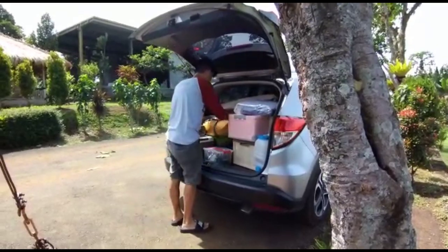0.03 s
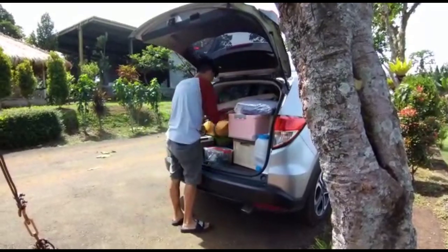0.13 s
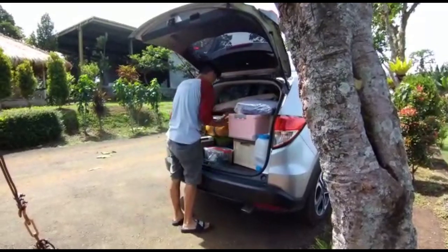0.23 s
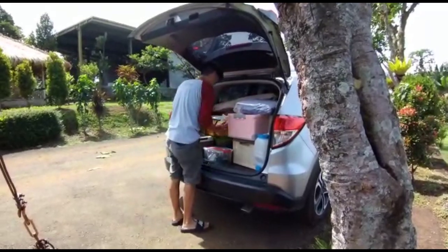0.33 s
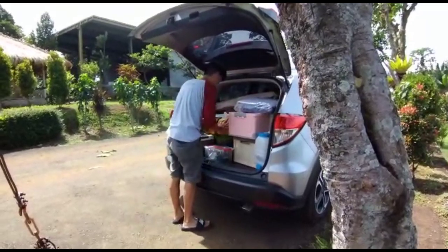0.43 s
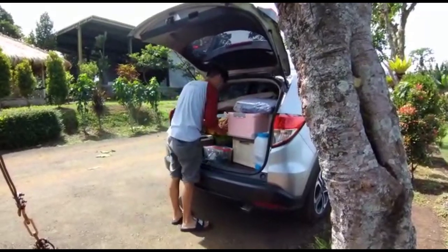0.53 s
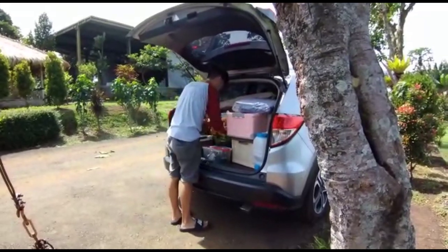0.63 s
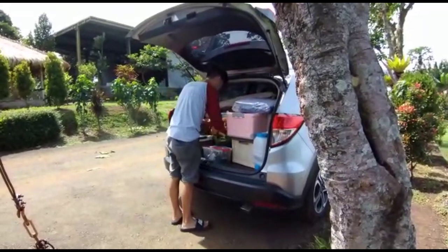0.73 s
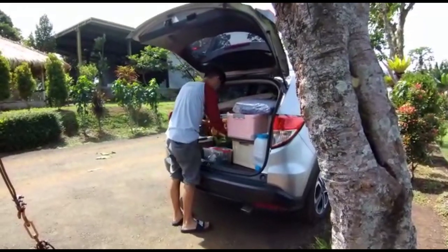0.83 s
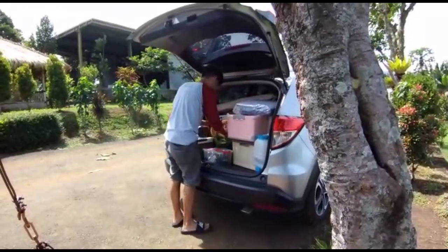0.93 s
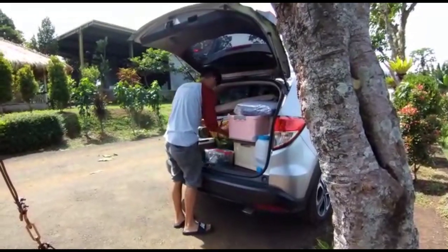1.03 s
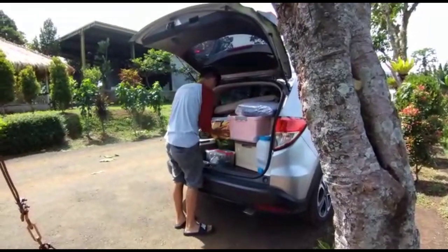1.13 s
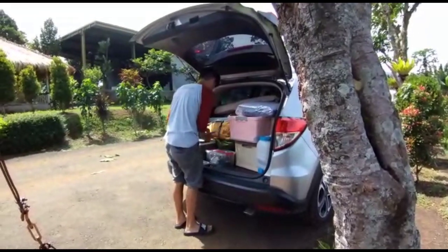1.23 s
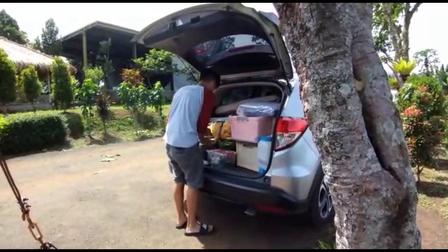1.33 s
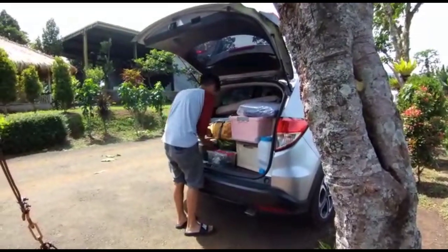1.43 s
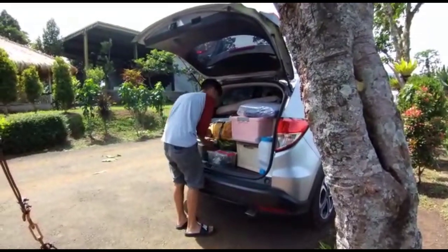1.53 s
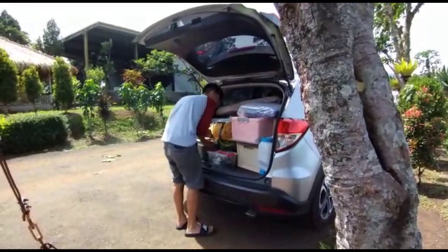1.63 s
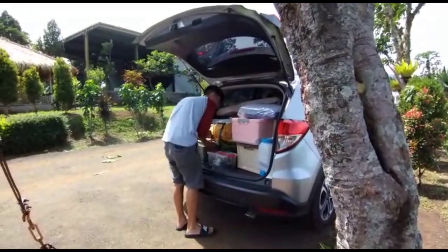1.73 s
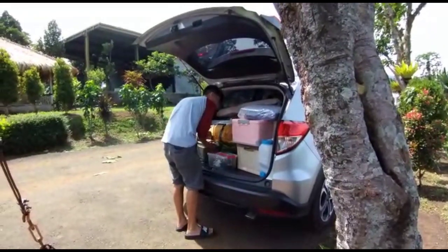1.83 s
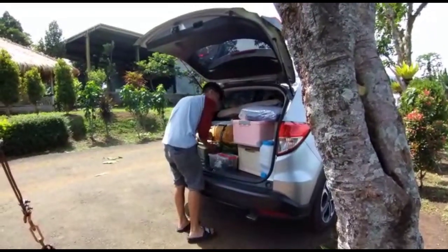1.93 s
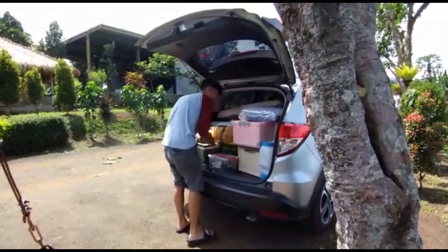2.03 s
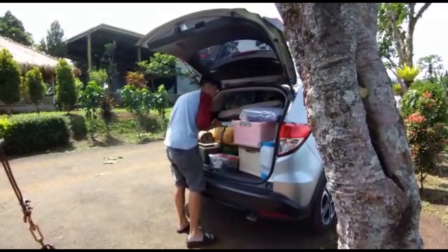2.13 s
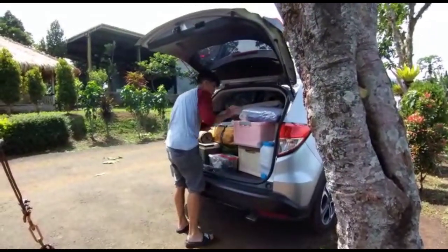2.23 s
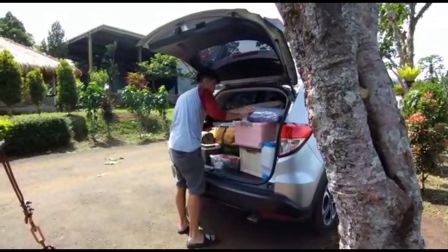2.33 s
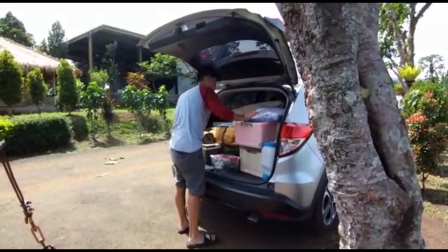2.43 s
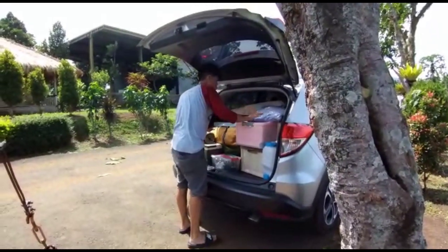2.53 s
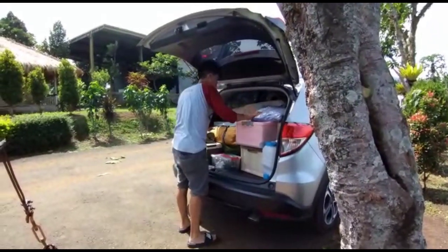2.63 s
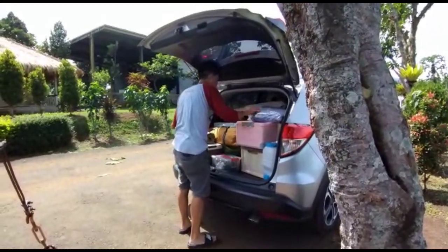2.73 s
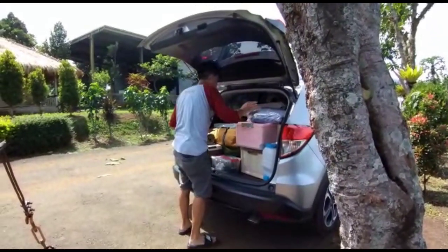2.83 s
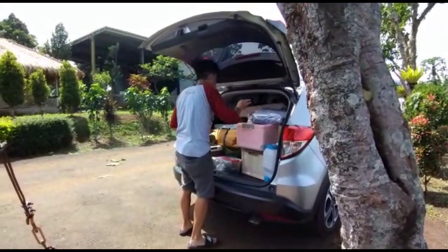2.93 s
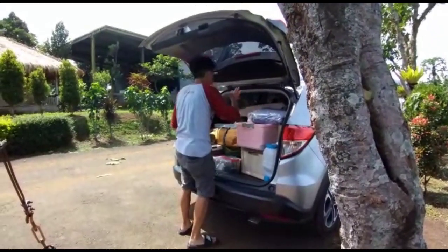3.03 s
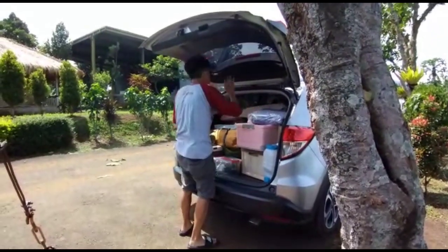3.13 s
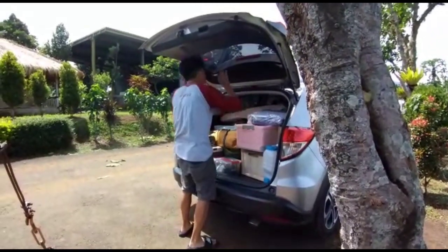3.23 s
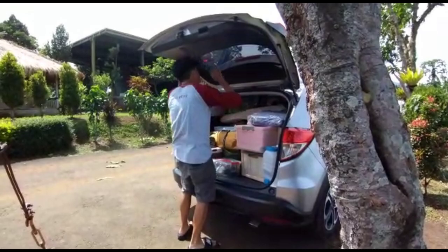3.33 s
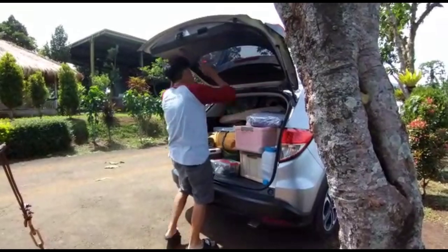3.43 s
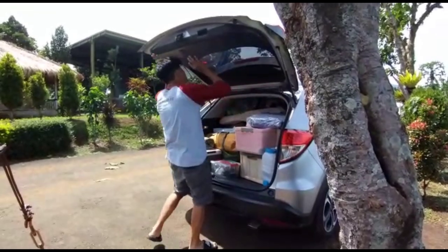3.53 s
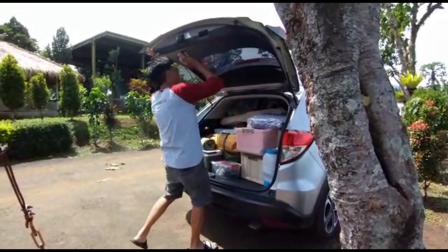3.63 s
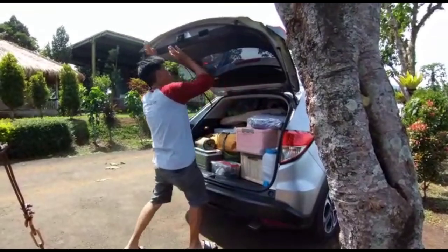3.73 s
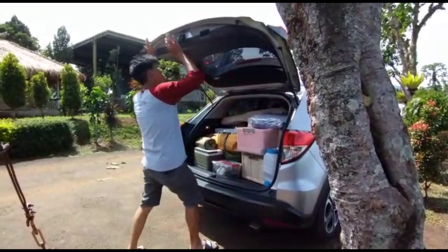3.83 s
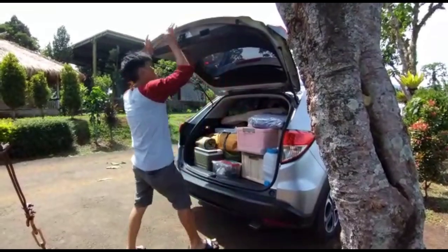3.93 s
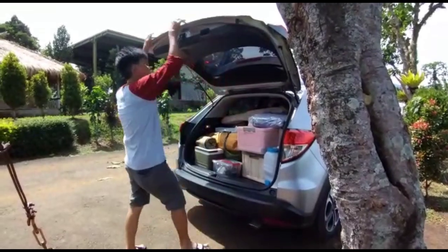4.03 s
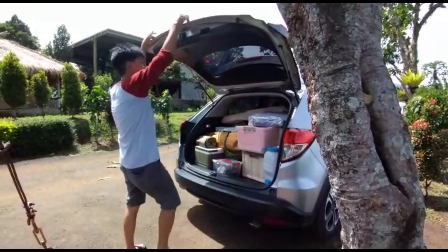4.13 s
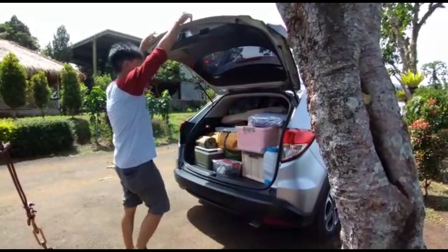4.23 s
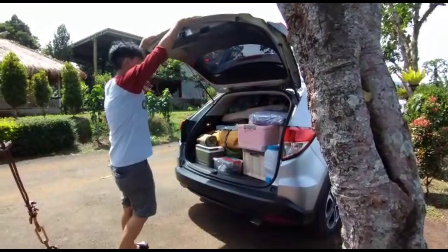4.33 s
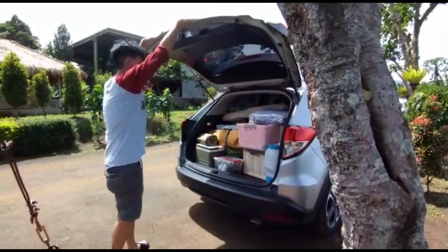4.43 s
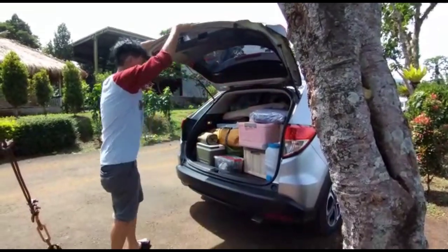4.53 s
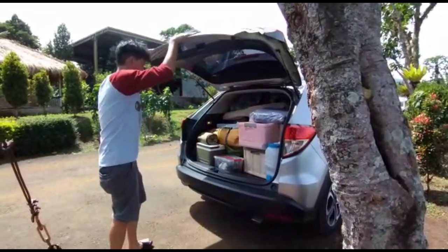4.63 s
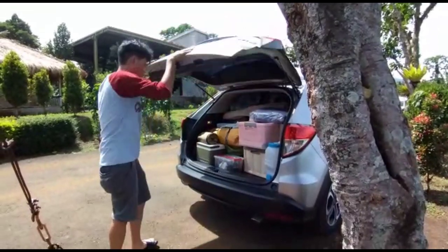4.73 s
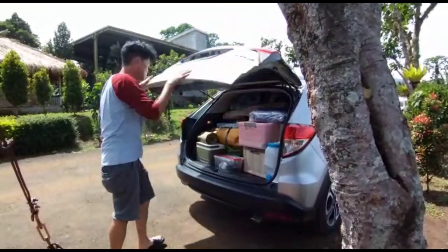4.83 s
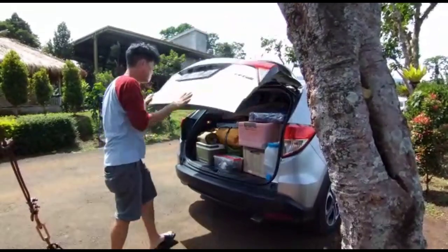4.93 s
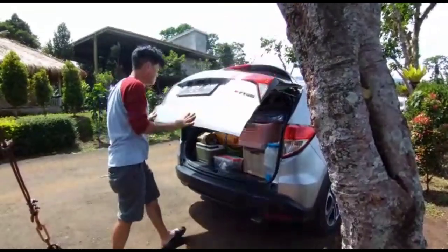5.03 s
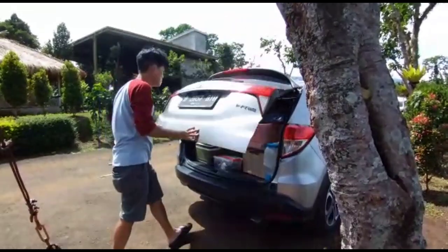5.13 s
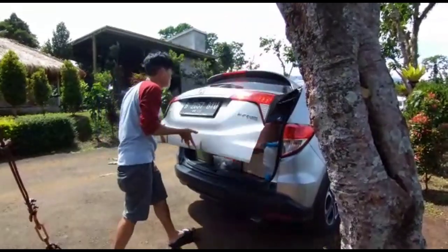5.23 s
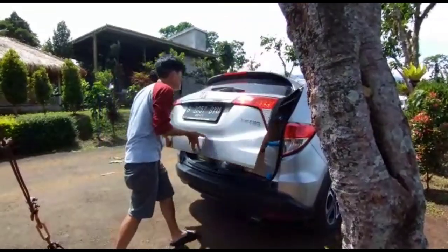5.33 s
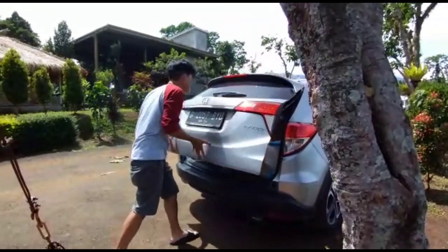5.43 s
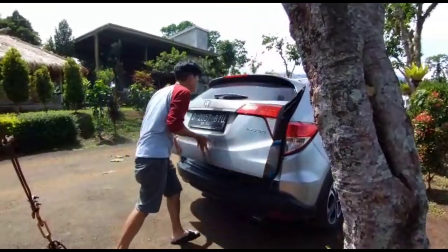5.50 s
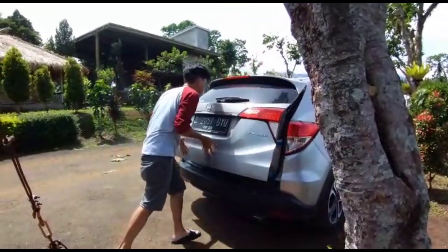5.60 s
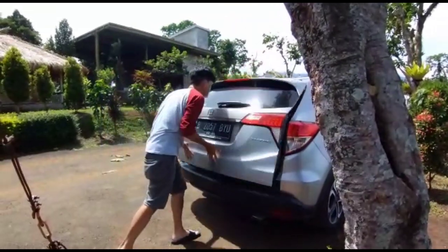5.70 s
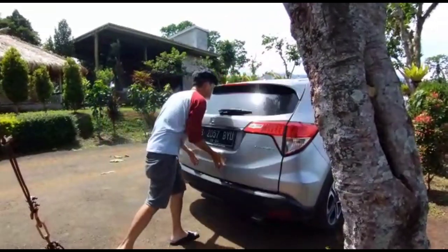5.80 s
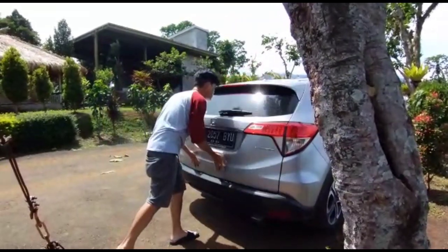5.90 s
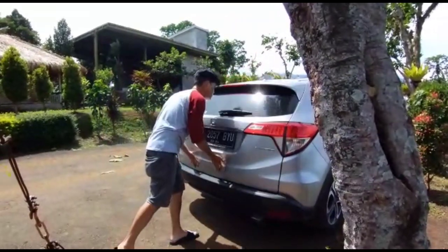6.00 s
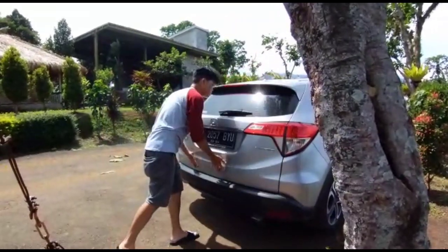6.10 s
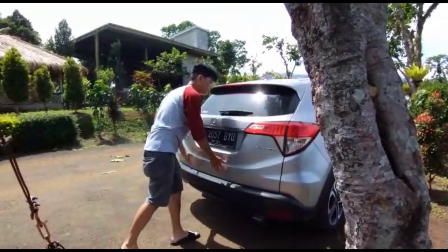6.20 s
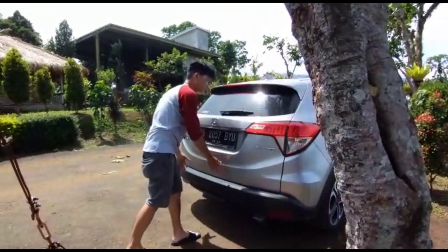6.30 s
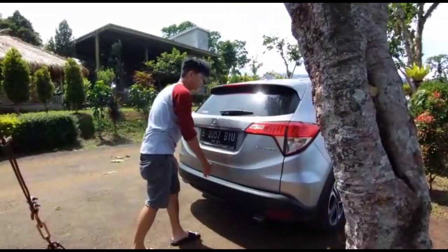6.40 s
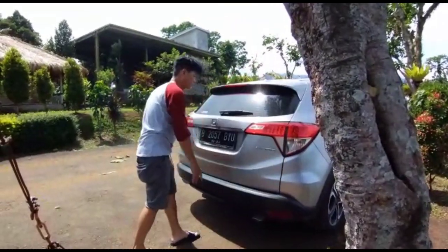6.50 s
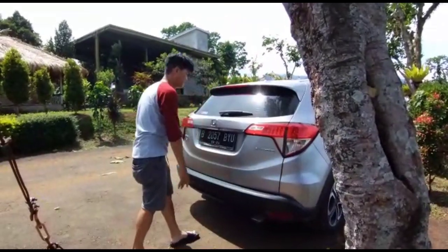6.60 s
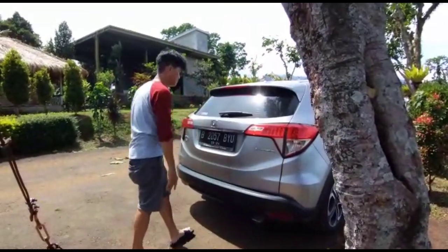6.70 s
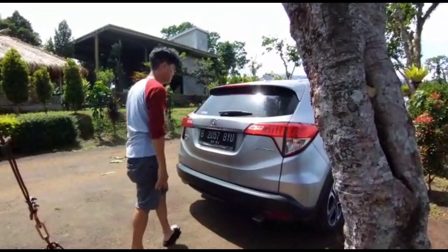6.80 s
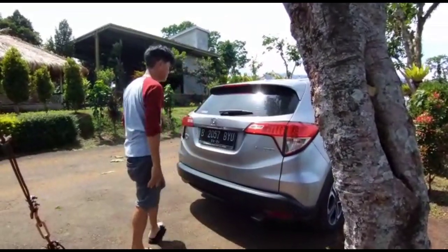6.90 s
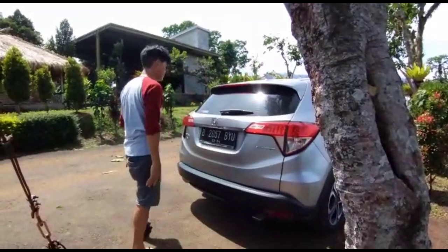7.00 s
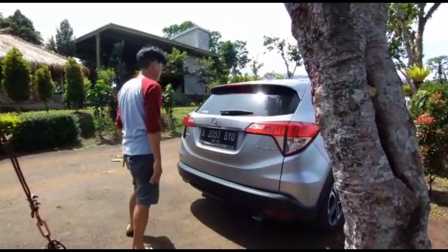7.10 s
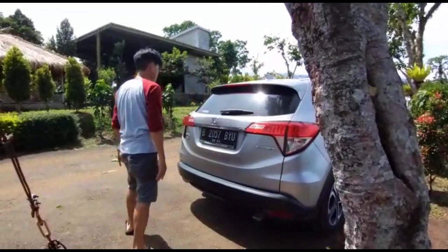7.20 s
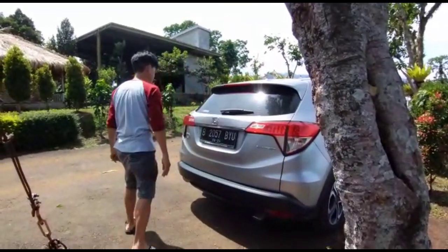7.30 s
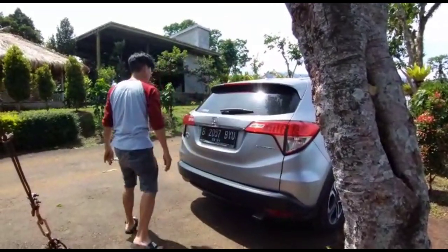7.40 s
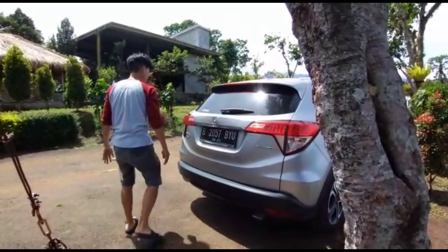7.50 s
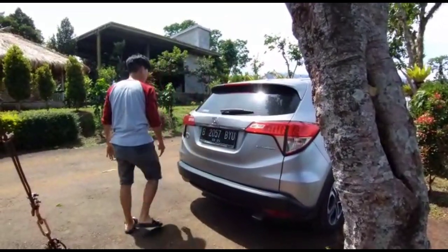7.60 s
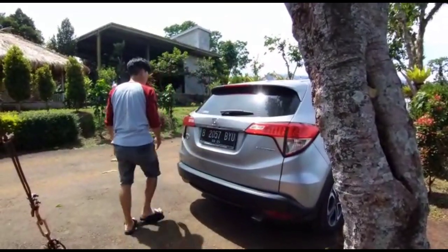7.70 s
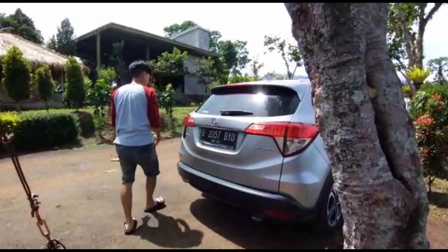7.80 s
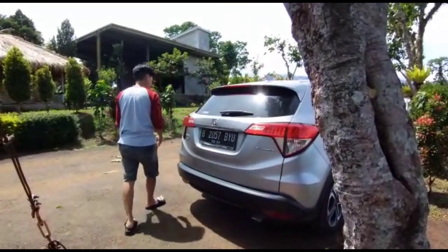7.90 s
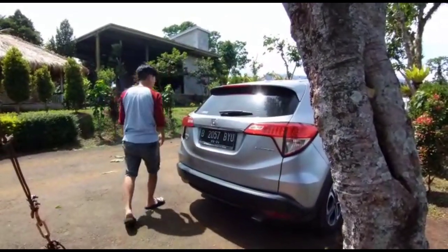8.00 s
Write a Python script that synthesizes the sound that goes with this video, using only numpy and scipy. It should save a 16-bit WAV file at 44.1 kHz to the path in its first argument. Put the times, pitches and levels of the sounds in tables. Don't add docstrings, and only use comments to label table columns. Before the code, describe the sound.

Quiet outdoor campsite: thin bird whistles and chirps, shimmering insects, a low far engine hum and light breeze. Luggage in a car boot ticks, rustles and knocks softly. A hinge gives slight clunks, then the tailgate slams late on with a deep hollow thud, metallic latch clack and quickly dying plastic rattle. Faint scuffs follow. Stereo microphone stands a few metres away in the open air.

```python
import sys
import numpy as np
from scipy import signal
from scipy.fft import rfft, irfft
from scipy.io import wavfile
from scipy.ndimage import uniform_filter1d

SR = 44100
rng = np.random.default_rng(int(sys.argv[2]) if len(sys.argv) > 2 else 0)


def put_to_file(sound):
    columns = np.atleast_2d(sound).T
    safe = np.clip(columns, -1, 1)
    whole_steps = np.round(safe * 32767)
    wavfile.write(sys.argv[1], SR, whole_steps.astype(np.int16))


def makeup_ratio(level_db):
    decades = np.asarray(level_db, float) / 20
    return 10 ** decades


N = 355049


def evened(x):
    return x / np.sqrt(np.mean(x ** 2) + 1e-20)


def read(points, hz):
    point_hz, value = np.transpose(points)
    return np.interp(np.log(hz + 1), np.log(point_hz + 1), value)


def curves(rows):
    s, *columns = np.transpose(rows)
    t = np.arange(s[0], s[-1], 1 / SR)
    return t, [np.interp(t, s, column) for column in columns]


def add(mix, s, sound):
    part = mix[..., max(round(s * SR), 0):][..., :sound.shape[-1]]
    part += sound[..., :part.shape[-1]]


def band(x, lo_hz, hi_hz, order=2):
    sos = signal.butter(order, [lo_hz, min(hi_hz, SR / 2.1)], "band", fs=SR, output="sos")
    return evened(signal.sosfilt(sos, x))


def resonate(x, hz, width_hz):
    return signal.lfilter(*signal.iirpeak(hz, hz / width_hz, SR), x)


def soft_ends(t):
    return signal.windows.tukey(len(t), 0.1)


def slow_noise(shape, window):
    noise = rng.standard_normal(shape)
    return evened(uniform_filter1d(uniform_filter1d(noise, window), window))


def ring(modes, rise_s=0.0003, soft=1, loose=1):
    t = np.arange(SR // 2) / SR
    detune = 1 + loose * rng.uniform(-0.032, 0.036, len(modes))
    phase = 2 * np.pi * soft * rng.random(len(modes))
    out = np.zeros(len(t))
    for (hz, db, t60_s), d, p in zip(modes, detune, phase):
        out += makeup_ratio(db - 60 * t / t60_s) * np.sin(2 * np.pi * hz * d * t + p)
    return out * (1 - np.exp(-t / rise_s)) ** 2


def crackle(size, per_s, spread_db, hiss):
    happens = rng.random(size) < per_s / SR
    scale = np.minimum(rng.exponential(1, size), 4)
    noise = rng.standard_normal((2, 2, size))
    snaps = evened(happens * makeup_ratio(spread_db * scale) * noise[0])
    return evened(snaps + hiss * noise[1])


# start_s, boom_db, panel_db, spot_hz, way (push +1, rebound -1)
GATE_BLOWS = [(5.87, -22, -26.5, 298, 1), (5.8756, -21.5, -28, 200, -1), (5.8827, -41, -24, 310, 1),
              (5.890, -31, -38, 200, 1), (5.9059, -34, -25.5, 406, 1), (5.914, -52, -35, 430, -1),
              (5.921, -41, -34, 340, 1), (5.9284, -49, -31.5, 293, -1), (5.943, -37, -36, 250, -1),
              (5.956, -27.5, -34, 300, 1), (5.963, -38, -36, 330, -1), (5.973, -49, -37, 410, 1),
              (5.979, -49, -42, 300, 1), (6.001, -40, -42, 300, 1), (6.039, -39, -41.5, 354, 1),
              (6.09, -43, -53.5, 300, 1), (6.134, -48, -54, 300, -1)]
# pitch_hz, level_db, t60_s (time to die by 60 dB)
BODY_BOOM = [(40, -5, .11), (60, -1.5, .12), (92, 2.5, .11), (120, -10, .2)]
# pitch_hz, level_db, t60_s
PANEL_SKIN = [(160, -8, 0.04), (208, 0.5, 0.057), (250, 5, 0.045), (291, 6.5, 0.065), (336, -1.5, 0.059),
              (391, 1.5, 0.062), (475, -6, 0.03), (604, -7, 0.035), (755, -8, .025)]


def gate_blows():
    out = np.zeros((2, N))
    spot_db_per_octave = -15
    shudder_db, shudder_t60_s = -5, 0.07
    t = np.arange(SR // 5) / SR
    fade = makeup_ratio(shudder_db - 60 * t / shudder_t60_s) * (1 - np.exp(-t / 0.003))
    for s, boom_db, panel_db, spot_hz, way in GATE_BLOWS:
        skin = [(hz, db + spot_db_per_octave * abs(np.log2(hz / spot_hz)), t60_s)
                for hz, db, t60_s in PANEL_SKIN]
        boom = makeup_ratio(boom_db) * ring(BODY_BOOM, 0.0045, 0.07)
        panel = makeup_ratio(panel_db - 2.5) * ring(skin, 0.0013, 0.093)
        shudder = band(rng.standard_normal(len(t)), 98, 360) * fade
        add(out, s, np.sign(way) * (boom + panel)[None])
        add(out, s, makeup_ratio(panel_db) * shudder[None])
    return out


# start_s, level_db
LATCH_CATCH = (5.8742, -26)
# pitch_hz, level_db, t60_s
LATCH_MODES = [(644, -11, 0.035), (1053, -5, 0.065), (1120, -1.5, 0.048), (1230, -10, 0.028),
               (1850, -8, 0.018)]


def latch():
    out = np.zeros((2, N))
    s, db = LATCH_CATCH
    add(out, s, makeup_ratio(db) * ring(LATCH_MODES, 0.0001, 0, 0)[None])
    return out


# time_s, level_db
SEAL_SQUEEZE = [
    (5.846, -64),
    (5.857, -60),
    (5.863, -43),
    (5.874, -38.5),
    (5.878, -53),
]


def seal():
    out = np.zeros((2, N))
    t, (db,) = curves(SEAL_SQUEEZE)
    add(out, t[0], makeup_ratio(db) * band(crackle(len(t), 4000, 1.5, 0.86), 550, 2500))
    return out


# start_s, peak_db, bright_share_db, dull_share_db, length_s
TRIM_HITS = [(5.873, -40, -5, 17.5, 0.026), (5.8795, -28.5, -7.5, -27, 0.022),
             (5.901, -39, 3.5, 9.5, 0.025), (5.917, -26, -8, -10, 0.018), (5.928, -35, -1, 6, 0.02),
             (5.947, -29.5, -13, -17, 0.019), (5.959, -23, -4, -7.5, 0.018), (5.973, -21, -3.5, -11, 0.011),
             (5.985, -35, -11, 1, 0.015), (6.012, -35, -4, -10, 0.014), (6.031, -33, -9, -5, 0.025),
             (6.035, -31.5, -1, -5, 0.0091), (6.056, -35, -18, -5, 0.0094), (6.104, -49.5, -6, 3.5, 0.046),
             (6.12, -40, -8, -26, 0.011), (6.13, -45, -8.0, -9, 0.011), (6.174, -46, -10, -18, 0.012),
             (6.187, -41.5, -8, -5, 0.015), (6.201, -55, -8.0, 9, 0.017), (6.24, -53, -7, 0.5, 0.025),
             (6.301, -56, -13, -2, 0.041)]
# pitch_hz, width_hz, level_db
TRIM_MODES = [(1780, 210, -3), (1990, 110, 11), (2300, 290, 11), (2550, 380, 1), (3740, 190, -16),
              (4380, 130, 0), (6330, 190, 2)]


def trim_rattles():
    out = np.zeros((2, N))
    size = 3000
    t = np.arange(size) / SR
    for s, db, bright_db, dull_db, length_s in TRIM_HITS:
        shape = (1 - np.exp(-t / 0.0034)) * np.exp(-(t / length_s) ** 1.17)
        snaps = crackle(size, 3500, 3.0, 0.6) * shape
        shift = rng.uniform(0.9, 1.026)
        trim = evened(sum(makeup_ratio(gain_db) * resonate(snaps, hz * shift, width_hz)
                          for hz, width_hz, gain_db in TRIM_MODES))
        hit = 0.67 * trim + 0.78 * band(snaps, 1800, 4680)
        hit += makeup_ratio(dull_db) * band(snaps, 710, 1920)
        hit += makeup_ratio(bright_db - 2) * band(snaps, 9000, 13500)
        add(out, s - 0.002, makeup_ratio(db - 9.0) * hit * np.sqrt(np.mean(shape ** 2)))
    return out


# start_s, peak_db, ring_hz, wide_share_db
PART_CLACKS = [(5.863, -38, 1100, -12), (5.8785, -28, 1790, -18), (5.883, -34, 1120, -8),
               (5.9, -39, 1080, -10), (5.912, -34, 1000, -12), (5.9205, -33, 2550, -8),
               (5.945, -31, 860, -12), (5.96, -30, 1620, -2), (5.9685, -42, 2500, 4),
               (5.973, -39, 1880, -8), (5.984, -39, 1710, -1), (6.014, -46, 2390, -2),
               (6.018, -40, 3530, -10), (6.0375, -41, 2480, 5), (6.044, -41, 3500, -4),
               (6.058, -46, 1620, -8), (6.1195, -45.5, 2390, -1), (6.126, -50, 1710, -4),
               (6.134, -46, 1650, -10), (6.177, -51, 2380, -9.5), (6.19, -49, 2340, -1),
               (6.202, -51, 2320, -6), (6.243, -53, 1650, -8)]
# start_s, peak_db, ring_hz, wide_share_db
SHARP_TICKS = [(0.028, -54, 1880, -8), (0.6092, -53, 1500, 2), (0.6204, -56, 2290, 3),
               (0.6235, -58, 2400, 0), (0.638, -45, 2010, -9), (0.6395, -44, 4730, -13),
               (0.6457, -37.5, 1850, -11), (0.649, -48, 1980, 3), (0.654, -49, 2300, -9),
               (0.659, -56, 1300, -6), (0.6565, -57, 4900, -2), (0.688, -64, 2600, 0),
               (0.721, -58, 1800, -6), (0.742, -61, 1090, -3), (0.747, -63, 850, -7), (0.672, -60, 3000, 3),
               (0.6794, -56, 1500, -5), (0.7285, -54, 1310, 0), (0.7355, -53, 3500, -4),
               (0.7372, -51, 900, -0.5), (1.768, -55, 1690, -2), (1.93, -50, 790, -6),
               (2.3855, -60, 4400, -4), (2.4, -52, 5090, 0), (2.443, -46, 5000, -12),
               (2.468, -48, 4530, -5), (2.698, -63, 4800, -7), (4.4285, -47.5, 1090, 0),
               (4.454, -54, 1500, -6), (5.368, -59, 1100, -2), (5.386, -56, 1600, -4),
               (5.408, -56, 1100, -6), (6.7845, -57, 2450, 4), (6.791, -57, 2630, -10),
               (6.8015, -47, 2630, -8), (6.8145, -52, 2550, -1), (6.821, -59, 2400, 3),
               (6.829, -60, 2500, -10), (6.857, -58, 5000, 3), (6.8635, -57, 2410, -10),
               (6.87, -54, 2550, -4), (6.877, -55, 2350, 2)]


def ticks(rows, t60_s):
    out, t = np.zeros((2, N)), np.arange(2000) / SR
    snap_s = 0.0008
    edge = band(t == 0, 500, 4800, order=1)
    noise = band(rng.standard_normal((len(rows), 2, len(t))), 560, 5300)
    snaps = 0.6 * noise * np.exp(-t / snap_s) + 2.5 * edge / edge.max()
    fade = makeup_ratio(-60 * t / t60_s) * (1 - np.exp(-t / 0.00027))
    for (s, db, hz, wide_db), snap in zip(rows, snaps):
        tone = np.sin(2 * np.pi * hz * np.array([[1], [1.04]]) * t) * fade
        add(out, s, makeup_ratio(db) * (makeup_ratio(wide_db) * snap + tone))
    return out


# peak_s, build_up_s, level_db, dull_share_db, crisp_share_db
LUGGAGE_RUSTLES = [(0.032, 0.014, -65.5, 8.5, 7.5), (.652, 0.049, -55.5, 3, -1.5),
                   (.69, 0.049, -77, 13, 11), (.73, 0.018, -70, 11, 7.5), (1.742, 0.046, -69.5, -11, 6.5),
                   (1.771, 0.038, -66, 9.5, 5), (1.81, 0.055, -79, -6, 13), (2.394, 0.035, -62.5, 0, 2),
                   (2.44, 0.072, -71, 5, 8), (2.495, 0.076, -62, -8, 0.5), (2.55, 0.048, -70, -12, 3),
                   (2.7, .07, -77.5, -3, 12.5), (4.04, 0.087, -68.5, 2.5, 3), (4.39, 0.039, -68.5, 6, 1),
                   (4.436, 0.023, -70.5, 11, 3), (4.49, 0.053, -85, 19, -4), (5.05, 1, -79.5, 11, -5),
                   (6.755, 0.069, -66.5, 2, -6), (6.805, 0.034, -64, -12, -4),
                   (6.865, 0.025, -61, -2, -1.5), (7.85, 0.046, -68, -1, -1), (7.885, 0.055, -70.5, -1, 0),
                   (7.97, 0.073, -72, 5.5, 3.5), (8.05, 0.06, -63.5, -5, -2.5)]


def rustles():
    layers = np.zeros((3, N))
    ends_db, let_go = -12.5, 0.99
    for s, rise_s, db, dull_db, crisp_db in LUGGAGE_RUSTLES:
        t, (level_db,) = curves([(s - rise_s, ends_db), (s, 0), (s + let_go * rise_s, ends_db)])
        shares_db = np.array([[0], [dull_db], [crisp_db]])
        add(layers, t[0], makeup_ratio(level_db + db + shares_db) * soft_ends(t))
    grains = crackle(N, 3500, 2.0, 0.8)
    middle, dull = band(grains, 1240, 2960), band(grains, 137, 1480)
    crisp = band(grains, 3950, 5440) + makeup_ratio(-3) * band(grains, 4600, 20000)
    return layers[0] * middle + layers[1] * dull + layers[2] * crisp


# start_s, peak_db, ring_hz, overtone_hz, overtone_db
SMALL_KNOCKS = [(0.607, -63, 245, 1600, -10), (0.653, -45, 417, 1010, -13), (0.732, -48.5, 480, 900, -5),
                (1.765, -44.5, 258, 717, -10), (1.931, -43, 417, 830, -27), (1.953, -49, 370, 650, -9),
                (3.663, -55, 310, 756, -20), (4.426, -41, 318, 750, -22), (4.453, -45, 199, 960, -21),
                (4.48, -41, 210, 770, -17), (5.367, -48, 430, 913, -12), (5.386, -45, 420, 890, -10),
                (5.407, -49, 420, 864, -12), (7.156, -46, 199, 464, -11.5)]


def knocks():
    out = np.zeros((2, N))
    t60_s = 0.044
    for s, db, hz, over_hz, over_db in SMALL_KNOCKS:
        modes = [(hz, 0, t60_s), (over_hz, over_db, t60_s * 1.7)]
        add(out, s, makeup_ratio(db) * ring(modes, 0.00048, 0)[None])
    return out


def glide(length_s, from_hz, to_hz, db, bend=1.24, fade_db=0, skip_db=0):
    u = np.linspace(0, 1, round(length_s * SR))
    waver, breaks = slow_noise((2, SR // 5), 130)[:, :len(u)]
    hz = from_hz + (to_hz - from_hz) * (1 - (1 - u) ** (1 / bend)) + 40 * waver
    handover = np.exp(-((hz - 3830) / 170) ** 2)
    level_db = db + fade_db * u + skip_db * handover + 2.0 * breaks
    return makeup_ratio(level_db) * np.sin(2 * np.pi * np.cumsum(hz) / SR) * signal.windows.tukey(len(u), 0.35)


# start_s, swell_s, pitch_hz, top_db, scoop_db
LONG_WHISTLES = [(.155, 0.16, 3490, -65, -70), (.9, .168, 3490, -63.5, -69), (2.205, 0.16, 3440, -66, -73),
                 (3.49, 0.172, 3450, -63.5, -68), (5, 0.16, 3397, -65, -75), (7.035, 0.212, 3350, -66, -72)]
# centre_s, half_width_s, change_db
WHISTLE_FALTERS = [
    (2.25, .02, -8),
    (2.315, .02, -10),
    (3.53, .015, -8),
    (7.118, .014, 6),
    (7.139, .008, -14),
]


def whistles():
    out = np.zeros(N)
    swell_db, sag_hz = -10, 50
    cut_s, cut_db, release_s, release_db = 0.008, -11, 0.06, -14
    scoop_s, scoop_low, scoop_bend = 0.034, 0.81, 0.392
    for s, swell_s, hz, db, scoop_db in LONG_WHISTLES:
        top_s = s + swell_s
        t, (sag, level_db) = curves([(s, 0.5, swell_db), (s + swell_s / 2, 0, 0.55 * swell_db),
                                     (top_s, -0.5, 0), (top_s + cut_s, 0, cut_db),
                                     (top_s + release_s, 0, release_db)])
        tone = np.sin(2 * np.pi * np.cumsum(hz + sag_hz * sag) / SR)
        add(out, s, makeup_ratio(db + level_db) * tone * soft_ends(t))
        add(out, s - scoop_s, glide(scoop_s + 0.0042, scoop_low * hz, hz, scoop_db, scoop_bend))
    now = np.arange(N) / SR
    for s, half_s, db in WHISTLE_FALTERS:
        out = out * makeup_ratio(db * np.exp(-((now - s) / half_s) ** 2))
    return out


# start_s, length_s, pitch_hz, level_db
BIRD_PIPS = [(.382, 0.02, 4970, -67), (1.131, 0.024, 5020, -61.5), (1.19, 0.045, 5020, -73),
             (3.2, 0.03, 4550, -73), (3.724, .018, 4930, -72), (3.365, .04, 4300, -73),
             (0.15, .016, 2300, -72), (0.206, .014, 2780, -73), (7.314, .014, 4975, -70),
             (2.4, 0.027, 3450, -76), (7.005, .025, 1700, -74), (7.1, .09, 1660, -79)]
# start_s, length_s, level_db
BIRD_SLIDES = [(.135, .08, -73.5), (1.114, .083, -66.5), (2.183, .095, -70.5), (3.28, .095, -72)]
# from_hz, to_hz
SLIDE_PITCHES = (5050, 4020)
# start_s, from_hz, to_hz, level_db
BIRD_DROPS = [(.421, 5120, 2540, -64.5), (1.175, 5100, 2710, -63), (3, 5730, 5100, -67),
              (3.765, 4800, 2950, -67.5), (3.826, 4730, 3220, -67.5), (5.295, 3650, 3100, -65),
              (7.352, 5110, 2310, -65)]
# start_s, length_s, from_hz, to_hz, level_db
BIRD_FLICKS = [(0.823, 0.016, 3110, 4330, -65.5), (2.122, 0.026, 3330, 4020, -74),
               (3.59, 0.013, 3660, 4230, -62), (3.912, .027, 4900, 5500, -73),
               (4.85, .115, 3750, 4110, -70.5), (6.957, 0.014, 3110, 3750, -70),
               (6.997, .022, 1800, 2950, -74), (1.542, .011, 4500, 3650, -62),
               (1.236, .016, 4750, 4200, -71), (0.312, .01, 3450, 3800, -72), (3.53, .02, 3200, 3450, -71)]


def chirps():
    out = np.zeros(N)
    for s, length_s, hz, db in BIRD_PIPS:
        add(out, s, glide(length_s, 1.006 * hz, 0.994 * hz, db))
    for s, length_s, db in BIRD_SLIDES:
        add(out, s, glide(length_s, *SLIDE_PITCHES, db, bend=0.58))
    for s, from_hz, to_hz, db in BIRD_DROPS:
        length_s = 0.017 + (from_hz - to_hz) / 99000
        add(out, s, glide(length_s, from_hz, to_hz, db, bend=0.8, fade_db=-5, skip_db=-14))
    for s, *stroke in BIRD_FLICKS:
        add(out, s, glide(*stroke))
    return out


def birds():
    flutter_db = 0.7 * slow_noise((2, N), 300)
    return np.sqrt(2) * (whistles() + chirps()) * makeup_ratio(flutter_db)


# time_s, level_db
INSECT_LEVEL = [(0, -73), (.75, -67.5), (2, -66), (2.5, -64), (3, -65.5), (3.9, -63.5), (4.3, -67),
                (5.8, -68), (6.5, -77), (6.8, -71), (8.05, -70.5)]


def insects(lumps):
    now = np.arange(N) / SR
    level_db = np.interp(now, *np.transpose(INSECT_LEVEL))
    noise = rng.standard_normal((4, N))
    chorus = band(noise[:2] * makeup_ratio(1.0 * lumps), 3700, 5110)
    leaf_hiss = band(noise[2:], 8800, 15100)
    return makeup_ratio(level_db - 3.0) * (chorus + makeup_ratio(-5.0) * leaf_hiss)


# time_s, level_db
ENGINE_LEVEL = [(0, -61.5), (.8, -57.5), (1.7, -59.5), (2.6, -59), (2.94, -64), (3.2, -61), (4.1, -67),
                (4.5, -59), (4.9, -67), (5.6, -68), (6.5, -60.5), (7.25, -68.5), (8.05, -61)]


def engine():
    level_db = np.interp(np.arange(N) / SR, *np.transpose(ENGINE_LEVEL))
    hum = rng.standard_normal(N)
    for _ in range(2):
        hum = resonate(hum, 133.6, 52)
    return makeup_ratio(level_db - 2.5) * evened(hum)


# centre_s, half_width_s, level_db
BREEZE_PUFFS = [(.15, 0.32, -55), (.73, 0.19, -60.5), (1.7, 0.38, -69), (2.34, 0.17, -57),
                (2.8, 0.15, -62.5), (3.19, 0.23, -63.5), (3.55, 0.3, -66), (4.83, 0.22, -60.5),
                (5.1, 0.24, -68), (6.3, 0.071, -63), (7.19, 0.08, -61.5), (7.8, 0.17, -66),
                (4.2, 0.18, -65.5)]
# time_s, level_db
WIND_GUST = [(2.86, -66), (2.91, -54), (2.99, -51), (3.085, -58), (3.11, -53), (3.21, -55), (3.29, -49.5),
             (3.36, -57), (3.5, -64)]


def wind(lumps):
    now = np.arange(N) / SR
    strength = makeup_ratio(-82)
    for s, half_s, db in BREEZE_PUFFS:
        strength = strength + makeup_ratio(db) * np.exp(-((now - s) / half_s) ** 2)
    out = strength * band(rng.standard_normal((2, N)) * makeup_ratio(3.7 * lumps), 41, 100.4)
    t, (gust_db,) = curves(WIND_GUST)
    eddies = band(crackle(len(t), 300, 1.5, 0.6), 45, 130)
    sides_db = np.array([[4.5], [-2.5]])
    add(out, t[0], makeup_ratio(gust_db + sides_db) * eddies * soft_ends(t))
    return out


# pitch_hz, level_db (per Hz)
AIR_COLOUR = [(30, -33), (60, -14), (80, -4), (156, -6), (256, -11), (333, -9), (600, -15.5), (1450, -21),
              (2200, -21), (3150, -21.5), (4800, -27.5), (6400, -28.5), (7900, -34.5), (11500, -30),
              (15300, -33)]
# pitch_hz, likeness (0 to 1)
AIR_LIKENESS = [(60, 0.78), (300, 1), (640, 0.027), (1400, 0.07), (3000, 0.32), (15000, 0.067)]


def air():
    frames, hz = N // 256 + 5, np.fft.rfftfreq(1024, 1 / SR)
    a, b, c, d, patches = rng.standard_normal((frames, 513, 5)).T
    patches = evened(uniform_filter1d(uniform_filter1d(patches, 12, 0), 14, 1))
    same = np.clip(read(AIR_LIKENESS, hz), 0, 1)[:, None]
    late = np.exp(-2j * np.pi * hz * 0.000457)[:, None]
    left = a + 1j * b
    right = same * late * left + np.sqrt(1 - same ** 2) * (c + 1j * d)
    z = np.array([left, right]) * makeup_ratio(read(AIR_COLOUR, hz)[:, None] + 2.13 * patches)
    hiss = signal.istft(z, nperseg=1024, noverlap=768)[1][:, :N]
    return makeup_ratio(-60.31) * evened(hiss)


# pitch_hz, t60_s
ECHO_DECAY = [(60, 0.093), (500, 0.22), (2000, 0.61), (8000, 0.55)]


def yard(x):
    taps = np.zeros((2, SR))
    slots = np.arange(400, SR - 40, 40)
    at = slots + rng.integers(0, 40, (2, len(slots)))
    np.put_along_axis(taps, at, rng.choice([-1., 1.], at.shape), 1)
    hz, t, z = signal.stft(taps, SR, nperseg=256)
    fade = makeup_ratio(-60 * t / read(ECHO_DECAY, hz)[:, None])
    tail = signal.istft(z * fade, SR, nperseg=256)[1]
    return signal.fftconvolve(np.atleast_2d(x), tail / np.linalg.norm(tail[0]), axes=1)[:, :N]


# pitch_hz, likeness (0 to 1)
CAR_LIKENESS = [(60, 1), (640, 1), (1400, 0.8), (3000, 0.56), (7000, 0.038), (15000, 0.055)]
# pitch_hz, left_minus_right_db
CAR_LEAN = [(400, 1.5), (1100, 1.5), (2500, 0.5), (5000, -2.5), (12000, -4.5)]


def spread(x):
    hz = np.fft.rfftfreq(N, 1 / SR)
    same = np.clip(read(CAR_LIKENESS, hz), 0, 1)
    lean = makeup_ratio(read(CAR_LEAN, hz) / 2)
    left, other = rfft(x)
    right = same * left + np.sqrt(1 - same ** 2) * other
    return irfft(np.array([left * lean, right / lean]), N)


def scene():
    car = gate_blows() + latch() + seal() + trim_rattles() + ticks(PART_CLACKS, 0.02)
    car += rustles() + knocks() + ticks(SHARP_TICKS, 0.014)
    song = birds()
    lumps = slow_noise((2, N), 1500)
    near = spread(car) + makeup_ratio(-20.5) * yard(car[0])
    trees = song + makeup_ratio(-5.5) * yard(song)
    return near + trees + insects(lumps) + engine() + wind(lumps) + air()


def band_limit(x):
    return signal.sosfilt(signal.butter(12, 15490, fs=SR, output="sos"), x)


# pitch_hz, left_minus_right_db
PORT_COLOUR = [(60, -1.5), (900, 0), (1800, -2.5), (2700, -1.5), (4200, -5), (6400, 13.5), (8100, 11),
               (9800, 4.5), (12500, 1.5), (15000, -3.5)]


def record(dry):
    hz = np.fft.rfftfreq(N, 1 / SR)
    tilt_db = read(PORT_COLOUR, hz) / 2
    edge = 1 / (1 + (hz / 15520) ** 80)
    mix = irfft(rfft(dry) * makeup_ratio(np.array([tilt_db, -tilt_db])) * edge, N)
    return band_limit(mix)


dry = scene()
out = record(dry)
put_to_file(out)
```